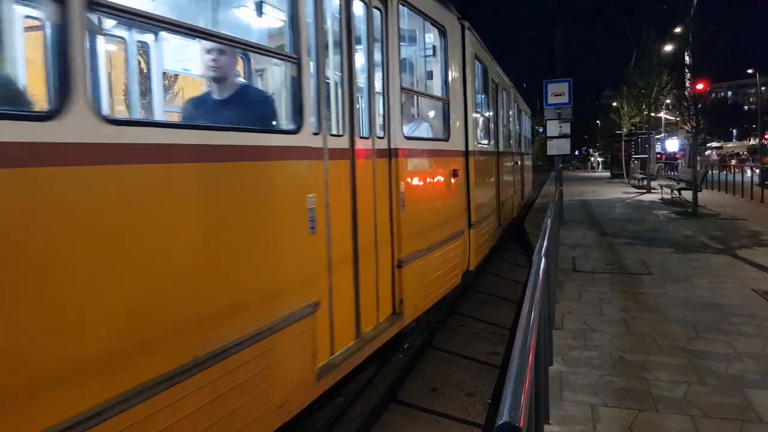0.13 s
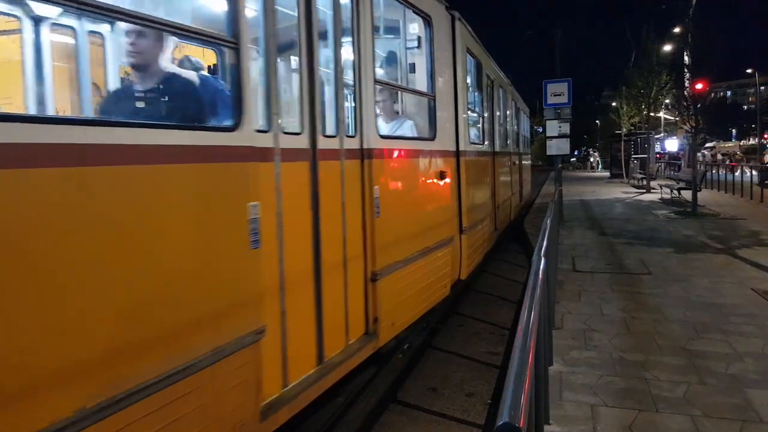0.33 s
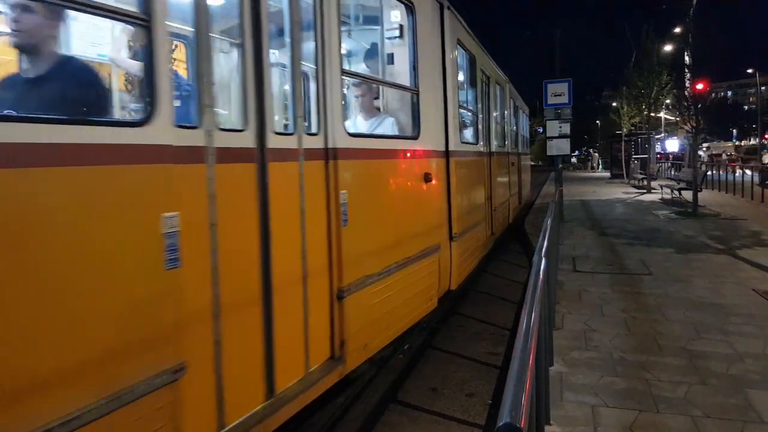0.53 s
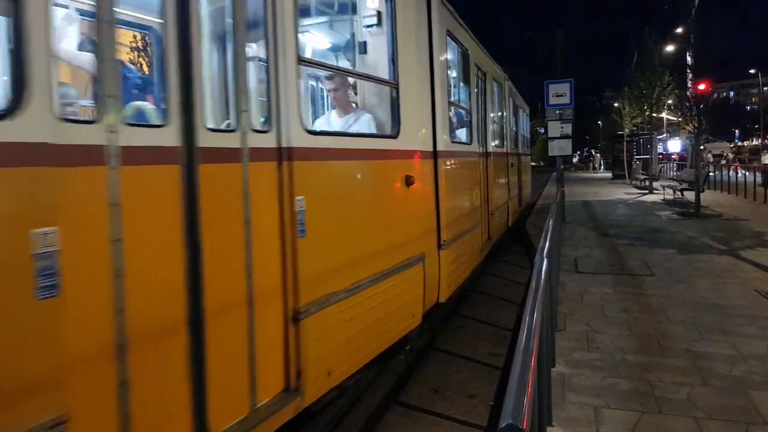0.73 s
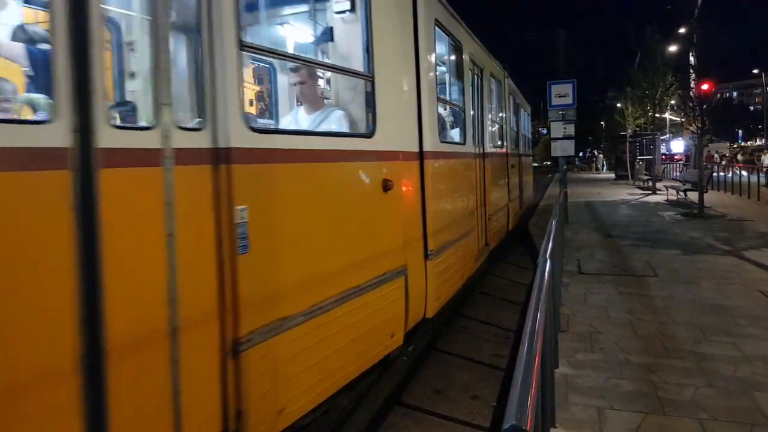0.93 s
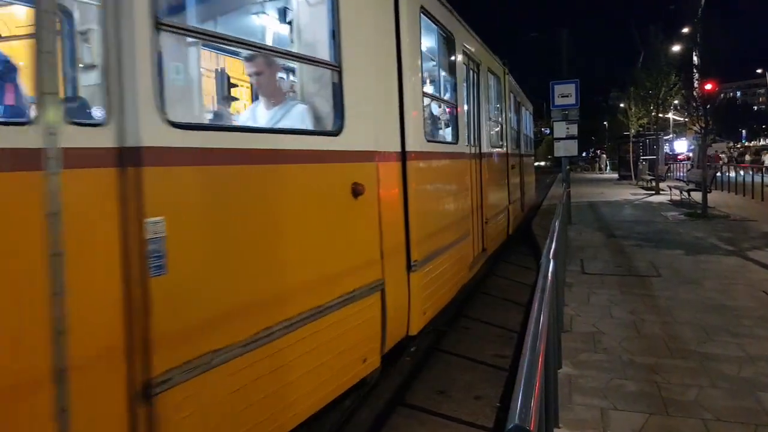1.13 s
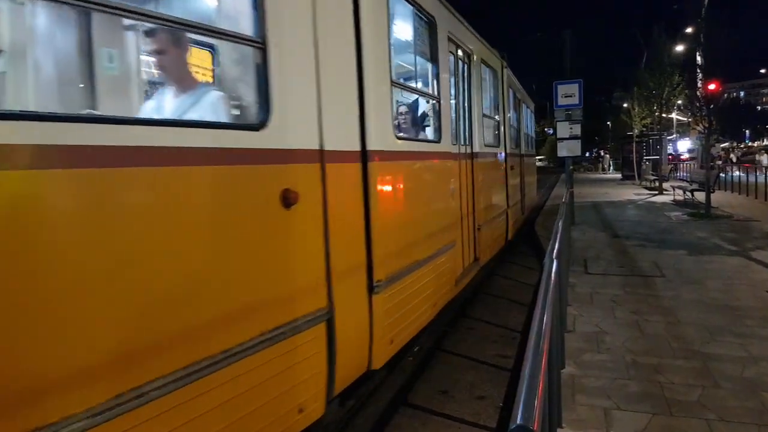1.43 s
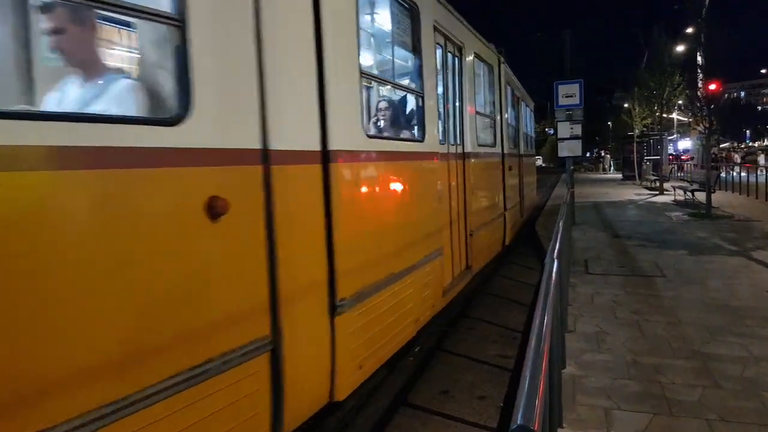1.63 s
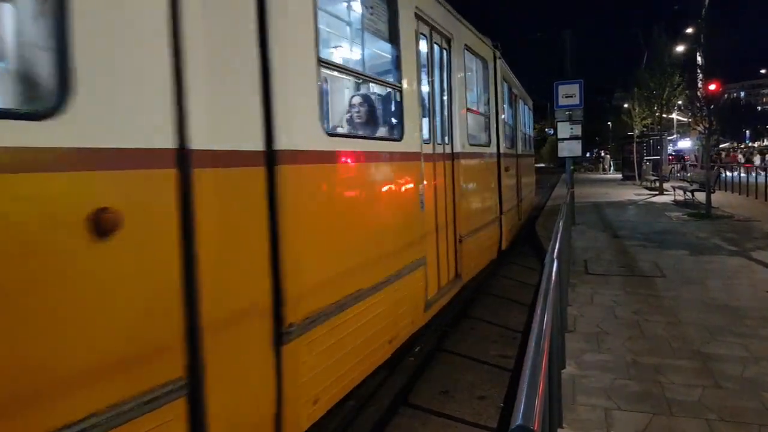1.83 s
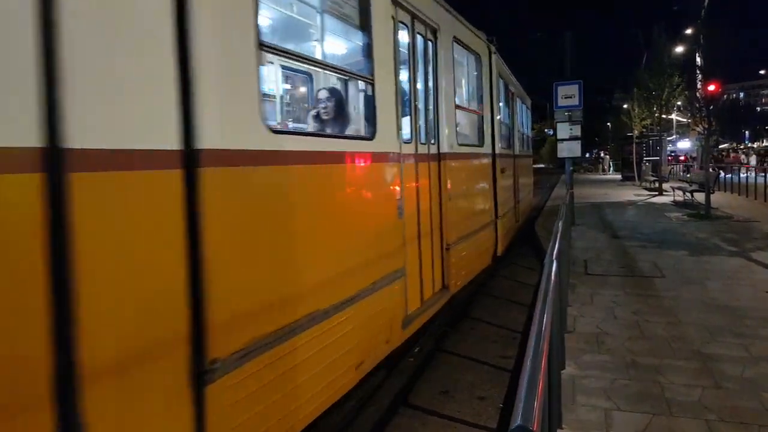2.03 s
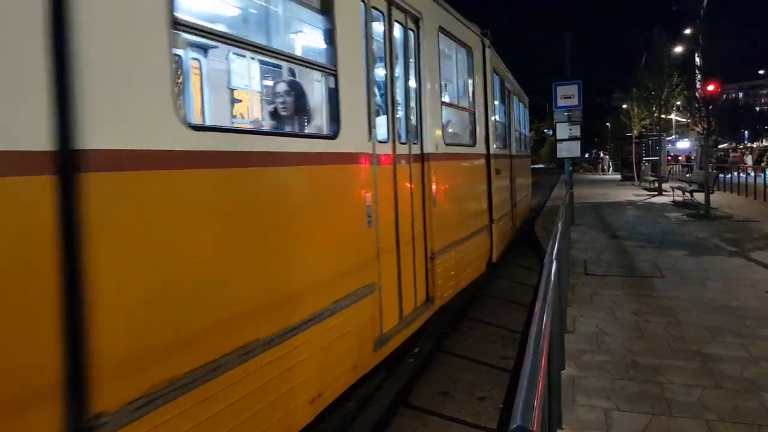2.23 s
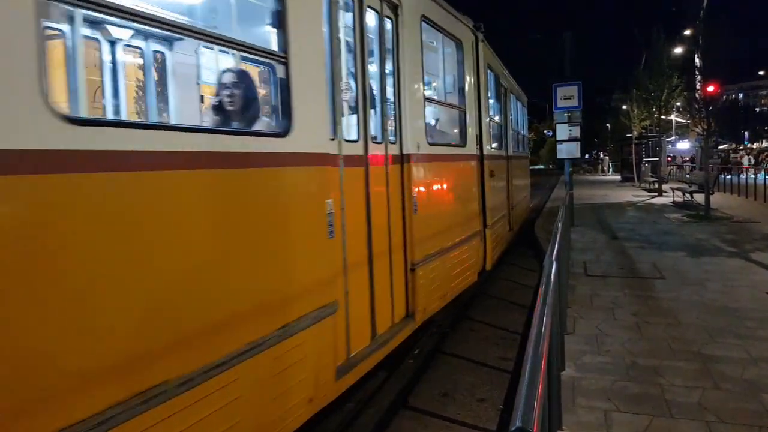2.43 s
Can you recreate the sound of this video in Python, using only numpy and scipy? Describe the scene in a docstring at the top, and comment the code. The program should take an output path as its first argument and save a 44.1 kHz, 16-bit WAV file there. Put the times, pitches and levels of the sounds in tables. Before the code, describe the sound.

A tram rolls past close on the left, with a deep rumble, rail roar and dull knocks throughout. A loud metal clack and tiny chirps come at about 0.8 seconds, then a brief squeal at 1 and hissing wheel grind around 1.2. A low boom swells at 1.4 and clacks cluster near 1.7. From 2.1 to 2.5 a wheel moans, rising slightly, with short squeals and clacks.

```python
"""Night tram, close on the left

A tram rolls past a street stop at arm's length. Its body rumbles and booms, the wheels roar on the
rails and the flanges grind as a bogie goes by. The running gear clacks, squeals and gives tiny chirps,
and towards the end a wheel moans on a rising note."""
import sys
import numpy as np
from scipy import signal
from scipy.io import wavfile
from scipy.ndimage import uniform_filter1d

SR = 44100
rng = np.random.default_rng(int(sys.argv[2]) if len(sys.argv) > 2 else 0)


def store_pcm(level_fs):
    """Save levels as 16-bit WAV."""
    pcm = np.round(np.clip(level_fs, -1, 1) * 32767).astype(np.int16)
    wavfile.write(sys.argv[1], SR, np.atleast_2d(pcm).T)


N = 114660
TIME = np.arange(N) / SR

# fader rides for body rumble, rolling roar and flange grind: t/s, level/dB
RUMBLE_RIDE = [(0.0, -25), (0.05, -29.5), (0.25, -28), (0.31, -23), (0.34, -28), (0.67, -19.5), (0.83, -25),
               (0.85, -23.5), (1.4, -24.5), (1.44, -24.5), (1.7, -21), (1.82, -23), (2.19, -28),
               (2.6, -23.5)]
ROLL_RIDE = [(0, -32), (.45, -33.5), (.75, -30), (1.0, -31), (1.17, -32), (1.42, -31.5), (1.55, -31.5),
             (1.7, -30.5), (1.85, -32.5), (2.22, -33), (2.45, -31), (2.6, -33.5)]
GRIND_RIDE = [(0, -47.5), (.5, -46), (.7, -39.5), (.94, -41), (1.01, -37.5), (1.09, -46), (1.12, -33),
              (1.175, -28), (1.2, -33.5), (1.225, -29), (1.34, -40.5), (1.43, -35.5), (1.52, -42.5),
              (1.66, -39), (1.77, -35), (1.87, -47), (2.25, -51), (2.6, -37.5)]
# swells of the deep boom, and of the flange biting until the wheel sings: t/s, relative level/dB
BOOM_RIDE = [(0, -18.5), (.42, -24.5), (.75, -16), (.88, -20.5), (1.05, -21), (1.17, -15.5), (1.34, -19),
             (1.385, -3.5), (1.46, -9.5), (1.53, -25), (1.61, -14), (1.69, -10), (1.84, -17.5),
             (2.08, -19.5), (2.24, -19.5), (2.34, -14.5), (2.6, -13)]
BITE_RIDE = [(.95, -75), (1.015, -51), (1.06, -67), (1.12, -63), (1.15, -37), (1.19, -49), (1.22, -36),
             (1.29, -53), (1.38, -66), (1.43, -53), (1.52, -55), (1.62, -61), (1.72, -63), (1.765, -50),
             (1.82, -71)]
# tone colours of the noise layers: f/Hz, relative spectral density/dB
RUMBLE_COLOUR = [(30, -72), (60, -6.5), (90, 4), (125, 1.5), (190, 0), (260, -4), (370, -12.5),
                 (520, -33.5), (1000, -40)]
ROLL_COLOUR = [(150, 9.5), (380, 4.5), (530, -2), (740, 4.5), (1050, -7.5), (1400, -3.5), (1950, -14.5),
               (2700, -13.5), (4200, -21.5), (6500, -28), (8300, -39), (12000, -34), (16000, -46)]
GRIND_COLOUR = [(400, 15), (1200, 5.5), (1900, 1), (3000, -3), (4500, -3.5), (6700, -5.5), (8300, -18.5),
                (11000, -9.5), (13500, -23.5), (16000, -31)]
CLACK_COLOUR = [(300, 2.5), (700, 5), (1200, 4.5), (1900, -2.5), (2700, 1), (3800, -3), (5200, -3),
                (6700, -6.5), (8200, -16), (10000, -12.5), (16000, -24)]
# dull wheel knocks through the body: t/s, relative level/dB, length/s, f/Hz
KNOCKS = [(0.047, -22.5, 0.037, 145), (0.474, -25, 0.056, 191), (0.646, -18.5, 0.043, 207),
          (0.724, -21.5, 0.12, 201), (1.133, -21, 0.13, 169.6), (1.307, -22.5, 0.11, 245.4),
          (1.694, -19.5, 0.049, 167)]
# high wheel resonances rubbed by the flange: f/Hz, width/Hz, relative level/dB
WHEEL_MODES = [(9850, 180, -15), (11050, 260, -12), (14760, 240, -9), (14800, 1600, -12), (15565, 170, -11)]
# running-gear clacks: t/s, crash level/dB, attack/s, length/s, crash t60 at 2500 Hz/s,
# tilt/(dB per octave), ring level/dB, ring centre/Hz, right-side lag/s
CLACKS = [(0.829, -25, 0.014, 0.026, 0.17, -.5, -34, 2730, .00031),
          (1.223, -36.5, 0.0052, 0.011, 0.1, -2, -36.5, 1650, .0001),
          (1.398, -39.5, 0.017, 0.039, 0.14, -3, -47, 2750, .00031),
          (1.665, -33, 0.024, .058, 0.083, -4.5, -43, 1160, .00014),
          (1.699, -42.5, .004, .013, 0.02, -1, -33.5, 1380, .00013),
          (1.716, -41.5, 0.005, 0.016, 0.039, 1.5, -36, 1850, .00012),
          (1.753, -40.5, 0.0035, 0.0067, 0.044, 2.5, -38, 1340, .00013),
          (1.96, -47.5, 0.0036, 0.057, 0.17, 4.5, -66, 4500, .00031),
          (2.266, -38.5, 0.0024, 0.0087, 0.083, -2, -37.5, 700, .00018),
          (2.473, -35, 0.0036, 0.0081, .08, 1.5, -48, 4700, .00031)]
# resonances of the gear: f/Hz, relative level/dB, t60 that sets the width/s
GEAR_MODES = [(705, -2, .1), (1110, 1, .14), (1375, 3, .035), (1820, 0, .08), (2490, 1, .014),
              (2900, 1, .014), (4750, -1, .012), (5720, 0, .012)]
# a wheel's rising moan: t/s, f/Hz, level/dB
MOAN = [(2.1, 735, -53), (2.17, 745, -38), (2.27, 784, -42), (2.295, 789, -48), (2.333, 791, -30.5),
        (2.385, 821, -54), (2.46, 821, -55), (2.498, 835, -34), (2.549, 876, -60)]
# wheel squeals: t/s, attack/s, length/s, starting f/Hz, glide/(Hz per s), level/dB, roughness/(0-1)
SQUEALS = [(1.008, .008, 0.016, 3710, 4498, -45, 0.75), (1.031, 0.0094, 0.01, 3860, 2800, -35.5, .15),
           (2.12, 0.018, 0.056, 2400, 0, -45, 0.81), (2.47, .005, 0.012, 4730, 8000, -53, 0),
           (2.521, 0.0048, .028, 2490, -1500, -38, 0.9)]
# tiny falling chirps: t/s, relative level/dB
CHIRPS = [(.642, -42), (0.765, -28.5), (.8016, -22.5), (.839, -27), (1.306, -37), (1.371, -40),
          (1.4675, -37), (1.506, -38), (1.5415, -34), (1.6158, -29.5)]
# sharp ticks: t/s, level/dB
TICKS = [(0.713, -45), (0.941, -46), (1.581, -44)]
# stereo balance: f/Hz, left minus right/dB
BALANCE = [(60, 2), (400, 1.8), (700, 2.5), (1300, 0.5), (2400, 0.5), (4400, 1), (6300, 7), (8500, 16),
           (12000, 4), (15000, 6)]
# stereo width: f/Hz, side against mid/dB
WIDTH = [(60, -40), (200, -48), (400, -24), (800, -9.5), (1300, -11), (2500, 2), (4500, -4.5), (6000, -0.5),
         (12000, -5)]


def body():
    """The car body rumbles, booms at its lowest resonance and passes on the knocks of the wheels."""
    rumble = ride(RUMBLE_RIDE) * roar(RUMBLE_COLOUR, flicker_db=0.5, shudder_db=1.5)
    boom = ride(BOOM_RIDE) * from_db(-8.5) * resonance(hz=55.5, width_hz=21.3, evenness=1)
    return rumble + boom + knocks()


def knocks():
    """Each jolt sets the body drumming briefly around one pitch."""
    out = np.zeros((2, N))
    for start, db, length, hz in KNOCKS:
        envelope = burst(start, attack=0.0093, length=length, t60=0.061)
        out += from_db(db - 2.5) * envelope * resonance(hz, width_hz=0.66 * hz, evenness=1)
    return out


def rolling():
    """Steel rolls on steel with a steady midrange roar."""
    return ride(ROLL_RIDE) * roar(ROLL_COLOUR, flicker_db=0.68, shudder_db=0.81)


def flanges(bite_flicker_db=4.5):
    """The flanges grind and crush grit; where they bite, the wheels sing unsteadily."""
    grit = from_db(-5) * rms_one(contacts(per_s=200, spread_db=1))
    grinding = ride(GRIND_RIDE) * roar(GRIND_COLOUR, flicker_db=4, shudder_db=0.7, grit=grit)
    singing = sum(from_db(db + bite_flicker_db * drift(40)) * resonance(hz, width_hz)
                  for hz, width_hz, db in WHEEL_MODES)
    return grinding + ride(BITE_RIDE) * singing


def clacks(ring_fall_db_per_octave=22):
    """Each clack is a dense rattle of contacts: a broad crash plus the ring of the gear."""
    crash = bands(CLACK_COLOUR, contacts(per_s=3200, spread_db=5.5))
    band_hz = np.array([hz for hz, _ in crash])
    band_power = np.array([np.mean(band ** 2) for _, band in crash])
    modes = [resonance(hz, np.log(1000) / np.pi / t60, evenness=0.56) for hz, _, t60 in GEAR_MODES]
    mode_hz, mode_db, _ = np.transpose(GEAR_MODES)
    out = np.zeros((2, N))
    for start, crash_db, attack, length, t60, tilt, ring_db, ring_hz, lag in CLACKS:
        clack = np.zeros((2, N))
        tilted = from_db(tilt * np.log2(band_hz))
        band_gains = from_db(crash_db) * tilted / np.sqrt(tilted ** 2 @ band_power)
        for (hz, band), gain in zip(crash, band_gains):
            band_t60 = t60 * np.sqrt(2500 / hz)  # the treble dies first
            clack += gain * burst(start, attack, length, band_t60) * band
        octaves_away = np.abs(np.log2(mode_hz / ring_hz))
        mode_gains = from_db(mode_db - ring_fall_db_per_octave * octaves_away)
        ring = rms_one(sum(gain * mode for gain, mode in zip(mode_gains, modes)))
        clack += from_db(ring_db) * burst(start, attack, length, 0.87 * t60) * ring
        out += from_left(clack, lag)
    return out


def moan():
    """A wheel rubs in surges on one low, slowly rising note."""
    times, hz, db = np.transpose(MOAN)
    surges = from_db(np.interp(TIME, times, db, left=-np.inf))
    return surges * stick_slip(np.interp(TIME, times, hz), roughness=0.64)


def squeals(t60=0.079):
    """A wheel catches and sings briefly on one note, steady or gliding."""
    out = np.zeros(N)
    for start, attack, length, hz, glide, db, roughness in SQUEALS:
        pitch = hz + glide * np.clip(TIME - start, 0, length + t60)
        out += from_db(db) * burst(start, attack, length, t60) * stick_slip(pitch, roughness)
    return out


def chirps(hz=7050, fall_hz_per_s=420000, rise_s=0.001, fade_s=0.0009):
    """Whistles of a few milliseconds that swell, dive in pitch and stop."""
    out = np.zeros(N)
    for peak_time, db in CHIRPS:
        age = TIME - peak_time
        swell = np.exp(-(age / np.where(age < 0, rise_s, fade_s)) ** 2)
        phase = 2 * np.pi * age * (hz - fall_hz_per_s * age / 2)
        out += from_db(db - 3) * swell * np.sin(phase)
    return out * from_db([[6], [-6]])  # panned well left


def ticks():
    """Thin, dry snaps, a few milliseconds long."""
    snaps = sum(from_db(db) * burst(start, attack=0.001, length=0.002, t60=0.009) for start, db in TICKS)
    return snaps * resonance(hz=12500, width_hz=7400, evenness=0.5)


def stick_slip(hz, roughness, waver_share=0.035, flutter_db=5):
    """A rubbed note on a pitch track; the rougher, the more its pitch and level waver."""
    pitch = hz * (1 + roughness * waver_share * drift(120))
    phase = 2 * np.pi * np.cumsum(pitch) / SR
    return rms_one(np.sin(phase) * from_db(roughness * flutter_db * drift(100)))


def contacts(per_s, spread_db):
    """Two mid/side pairs of crackle: small random impacts of uneven size."""
    shape = (2, 2, N)
    hits = rng.random(shape) < per_s / SR
    return hits * rng.standard_normal(shape) * from_db(spread_db * rng.standard_normal(shape)) + 1e-18


def roar(colour, flicker_db, shudder_db, grit=0):
    """Coloured noise plus any grit, whose bands flicker singly and shudder together; rms 1."""
    drive = rng.standard_normal((2, 2, N)) + grit
    noise = sum(band * from_db(flicker_db * drift(27)) for _, band in bands(colour, drive))
    return rms_one(noise * from_db(shudder_db * drift(17.3)))


def bands(colour, drive):
    """Coloured third-octave bands, fed by two mid/side pairs in turn: [(f/Hz, stereo band)]."""
    edges = 28 * 2 ** (np.arange(29) / 3)
    out = []
    for k, (low, high) in enumerate(zip(edges, edges[1:])):
        if colour[0][0] <= high and low <= colour[-1][0]:
            hz = np.sqrt(low * high)
            gain = from_db(at_hz(colour, hz)) * np.sqrt(high - low)
            out.append((hz, gain * place(band_pass(drive[k % 2], low, high), hz)))
    return out


def resonance(hz, width_hz, evenness=0):
    """A stereo resonance driven by noise; evenness (0-1) compresses its swings in level."""
    noise = rng.standard_normal((2, N + SR // 4))  # pre-roll lets the filter settle
    ring = place(band_pass(noise, hz - width_hz / 2, hz + width_hz / 2)[:, -N:], hz)
    power = uniform_filter1d(np.mean(ring ** 2, axis=0), int(SR / width_hz) + 1) + 1e-9
    return rms_one(ring / power ** (evenness / 2))


def place(pair, hz):
    """Mid/side to left/right, with the width and balance of that pitch; rms 1."""
    mid, side = pair
    stereo = mid + from_db(at_hz(WIDTH, hz)) * side * [[1], [-1]]
    pan_db = at_hz(BALANCE, hz) / 2
    return rms_one(stereo * from_db([[pan_db], [-pan_db]]))


def from_left(stereo, lag_s):
    """The right channel trails the left."""
    left, right = stereo
    return np.array([left, np.interp(TIME - round(lag_s * SR) / SR, TIME, right, left=0)])


def burst(start, attack, length, t60):
    """Envelope: linear attack, then an exponential release from `length` seconds after the start."""
    out = np.zeros(N)
    live = slice(int(start * SR), int((start + length + t60) * SR))
    age = TIME[live] - start
    out[live] = np.clip(age / attack, 0, 1) * from_db(-60 * np.maximum(age - length, 0) / t60)
    return out


def drift(rate_hz):
    """Smooth random modulation of rms 1, drawn once every 40 samples."""
    pole = np.exp(-2 * np.pi * rate_hz * 40 / SR)
    noise = rng.standard_normal(N // 40 + 2002)
    slow = signal.lfilter([1], [1, -2 * pole, pole * pole], noise)[2000:]
    return np.interp(np.arange(N) / 40, np.arange(len(slow)), rms_one(slow))


def band_pass(x, low, high):
    """Gentle band-pass, edges in Hz."""
    edges = np.clip([low, high], 10, 0.47 * SR)
    return signal.sosfilt(signal.butter(2, edges, "band", fs=SR, output="sos"), x)


def ride(curve):
    """Gain over time from rows of t/s, level/dB."""
    return from_db(np.interp(TIME, *np.transpose(curve)))


def at_hz(curve, hz):
    """Read a dB curve on a log-frequency axis."""
    curve_hz, db = np.transpose(curve)
    return np.interp(np.log(hz), np.log(curve_hz), db)


def from_db(db):
    """Decibels to gain."""
    return 10 ** (np.asarray(db) / 20)


def rms_one(x):
    """Scale to rms 1."""
    return x / np.sqrt(np.mean(x ** 2) + 1e-20)


def scene():
    """The mix: every layer of the tram reaches the left side first."""
    gear = squeals() + ticks() + flanges() + chirps()
    return (from_left(body(), lag_s=0.00027)
            + from_left(rolling(), lag_s=0.00025)
            + from_left(gear, lag_s=0.00032)
            + from_left([moan()] * 2, lag_s=0.00022)
            + clacks())


def record(dry):
    """Master EQ: a gentle low cut and a steep high cut."""
    low_cut = signal.butter(2, 30, "high", fs=SR, output="sos")
    high_cut = signal.ellip(12, 0.2, 80, 15850, fs=SR, output="sos")
    return signal.sosfilt(high_cut, signal.sosfilt(low_cut, dry))


dry = scene()
out = record(dry)
store_pcm(out)
```